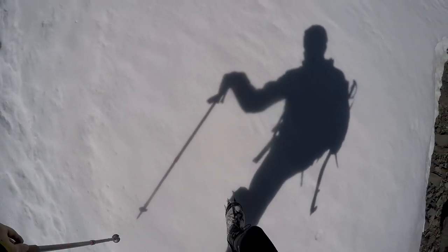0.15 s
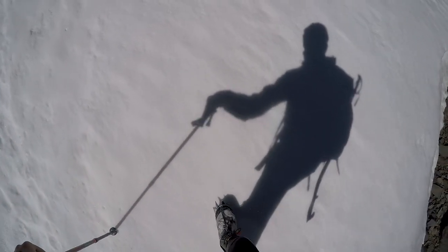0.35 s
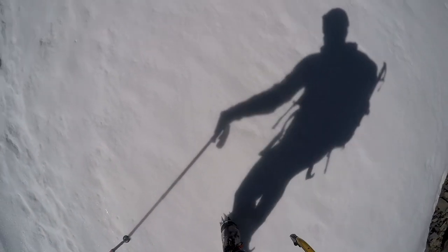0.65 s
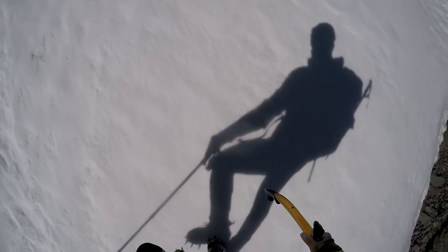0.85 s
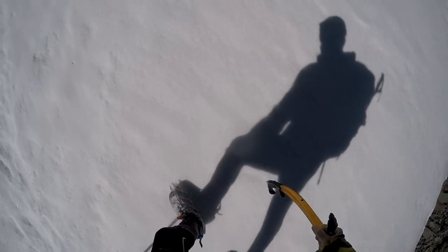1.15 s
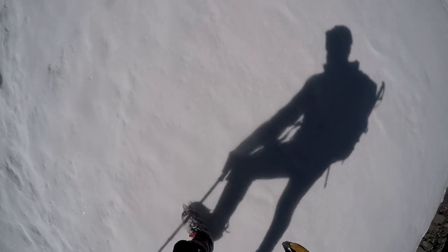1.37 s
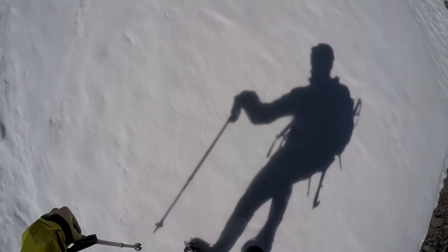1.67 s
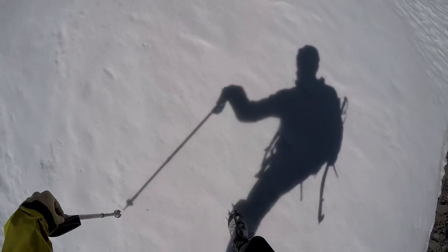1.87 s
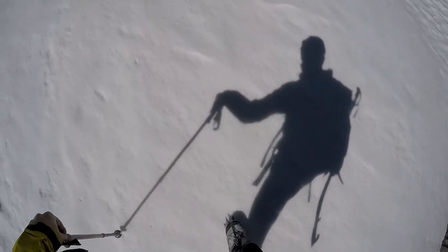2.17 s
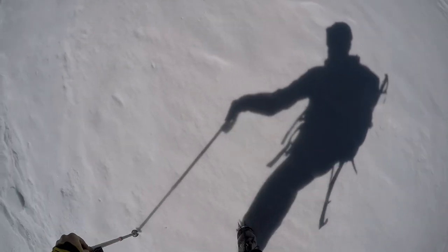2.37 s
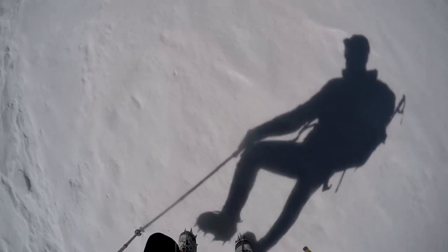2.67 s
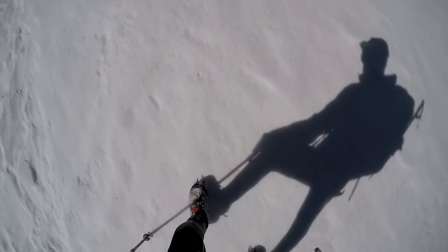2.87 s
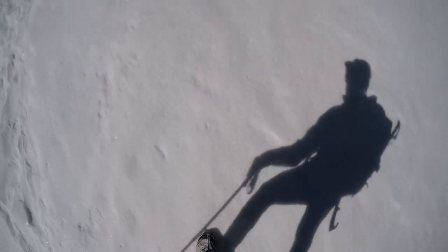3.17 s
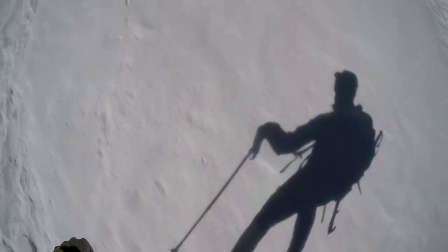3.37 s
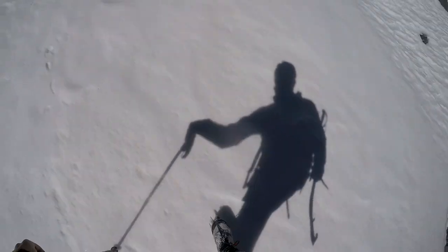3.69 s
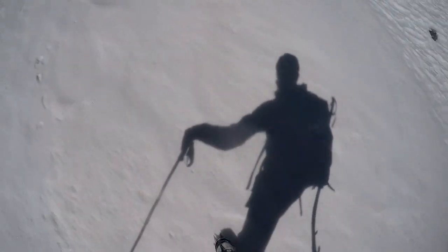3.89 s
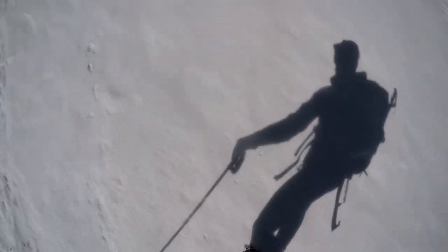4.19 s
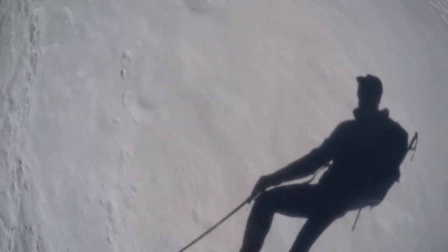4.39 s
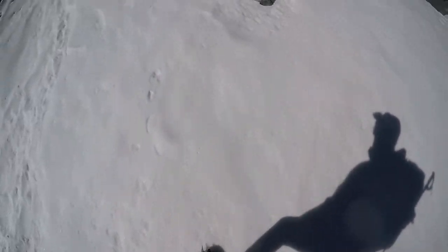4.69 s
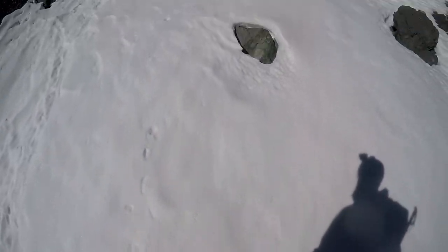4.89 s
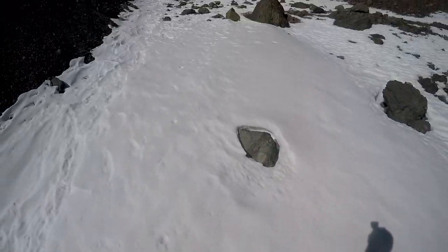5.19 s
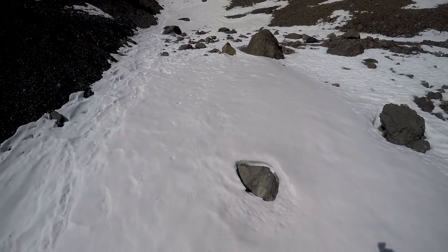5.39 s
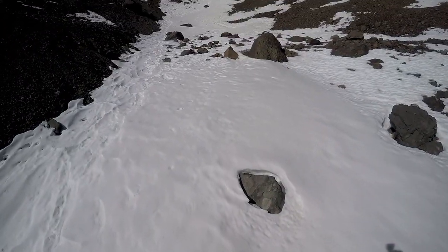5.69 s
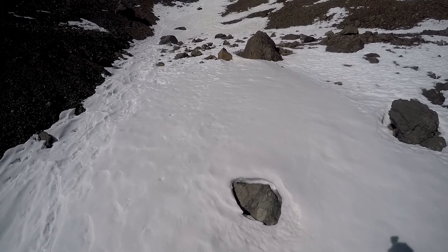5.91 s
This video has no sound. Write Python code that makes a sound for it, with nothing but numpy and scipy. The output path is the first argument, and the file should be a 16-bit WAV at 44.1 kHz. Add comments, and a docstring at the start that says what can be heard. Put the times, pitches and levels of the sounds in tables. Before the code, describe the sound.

Light wind rumbles on a helmet microphone on an open mountainside, with no echo. Spiked boots crunch into firm snow in six even steps, along with small crunches from a pole and faint metal ticks as the boots lift. Close, dull knocks from the camera mount fall between the steps. Toward the end the steps stop, a strap rasps, the mount knocks and scrapes, and the wind grows gustier.

```python
"""A climber walks up firm snow in crampons with a pole, heard from a camera on the helmet.
From the start, light wind rumbles on the camera case over a steady hiss, and straps rub.
Then, step by step, spikes crunch into the crust, the snow creaks under the weight, the camera's
loose mount knocks and the lifting crampon ticks. Later the mount also slips and the helmet hums.
Near the end the head lifts: a strap jerks tight and the wind buffets harder."""
import sys
import numpy as np
from scipy import signal
from scipy.fft import rfft, irfft, next_fast_len
from scipy.io import wavfile
from scipy.ndimage import uniform_filter1d, map_coordinates

SR = 44100
rng = np.random.default_rng(int(sys.argv[2]) if len(sys.argv) > 2 else 0)


def output_pcm(signal):
    """Save a mono or channel-first signal as 16-bit PCM at the path in sys.argv[1].

    Samples are clipped to [-1, 1] before scaling.
    """
    pcm = np.clip(np.atleast_2d(signal).T, -1, 1) * 32767
    wavfile.write(sys.argv[1], SR, np.round(pcm).astype(np.int16))


N = 266805


def amp(db):
    """Turn decibels into a number to multiply by."""
    return 10 ** (np.asarray(db) / 20)

def unit(x):
    """Scale a sound to an average (rms) level of 1."""
    return x / np.sqrt(np.mean(x ** 2) + 1e-20)

def along(points, hz):
    """Read between (pitch_hz, level_db) points, spacing the octaves evenly."""
    pitches, levels = np.transpose(points)
    return np.interp(np.log(hz + 1), np.log(pitches + 1), levels)

def tilt(hz, db_per_octave):
    """Decibels that make a sound brighter or duller, pivoting at 1000 Hz."""
    return db_per_octave * np.log2(np.clip(hz / 1000, .2, 2))

def filtered(x, response):
    """Multiply each frequency in a sound by response(hz)."""
    size = next_fast_len(len(x) + SR // 8)
    return irfft(rfft(x, size) * response(np.fft.rfftfreq(size, 1 / SR)), size)[:len(x)]

def coloured(x, tone):
    """Shape a sound with a tone table, at an average level of 1."""
    return unit(filtered(x, lambda hz: amp(along(tone, hz))))

def add(track, start_s, sound):
    """Mix a sound into the track."""
    start = max(round(start_s * SR), 0)
    part = track[start:start + len(sound)]
    part += sound[:len(part)]

def wobble(per_s):
    """A smooth curve through per_s random values a second."""
    points = rng.standard_normal(int(N * per_s / SR) + 4)
    return map_coordinates(points, [np.arange(N) * per_s / SR])

def grains(n, per_s, spread_db):
    """Tiny clicks of random size at random moments, like things cracking or catching."""
    sizes = amp(spread_db * np.clip(rng.standard_normal(n), -2, 2))
    signs = rng.choice([-1, 1], n)
    return unit(sizes * signs * (rng.random(n) < per_s / SR))

def stroke(length_s, rise):
    """A brief push: it builds over the share of its length given by rise, then dies away."""
    progress = np.arange(SR // 4) / SR / max(length_s, .003)
    force = (1 - np.exp(-progress / max(rise, .01))) * np.exp(-progress ** 2)
    return force / force.max()

def efforts(rows, fade_s):
    """Steady pushes that fade in and out, one per (start_s, end_s, level_db) row."""
    t = np.arange(N) / SR
    return sum(amp(db) * np.clip(np.minimum(t - start, end - t) / fade_s + .5, 0, 1)
               for start, end, db in rows)

def weight(levels_db, fade_s):
    """The climber's weight settling on the boot, at one level for each row of STEPS."""
    rows = [(start + wait, start + wait + hold, db)
            for (start, _, _, _, wait, hold, *_), db in zip(STEPS, levels_db)]
    return efforts(rows, fade_s)

def eddies(tone, evenness):
    """Swirling air: deep noise with its swells partly evened out."""
    flow = coloured(rng.standard_normal(N), tone)
    power = np.abs(signal.hilbert(flow)) ** 2
    swell = np.abs(uniform_filter1d(power, SR // 20)) + 1e-3
    return unit(flow / swell ** (evenness / 2))


# How hard the wind blows: time_s, level_db
WIND_STRENGTH = [(0.0, -29), (0.12, -40), (0.49, -36), (0.54, -25), (0.83, -31.5), (1.04, -48.5),
                 (1.18, -34), (1.35, -41.5), (1.38, -32.5), (1.75, -37.5), (2.02, -30.5), (2.07, -40),
                 (2.34, -31), (2.63, -47.5), (3.15, -36), (3.3, -47), (3.74, -40.5), (3.79, -28),
                 (4.4, -42.5), (4.68, -25.5), (4.72, -34), (4.89, -27.5), (4.95, -32.5), (5.17, -28),
                 (5.24, -41), (5.49, -27.5), (6.0, -31), (6.05, -35)]
# Single gusts thumping the case: peak_s, level_db, half_length_s
WIND_GUSTS = [(0, -43, 0.022), (0.598, -36, 0.032), (3.865, -41.5, 0.034), (4.902, -33.5, 0.045),
              (5.12, -36, .04), (5.653, -30.5, 0.078), (5.954, -35.5, 0.073)]
# Tones of the deep rumble and of the buffeting: pitch_hz, level_db
RUMBLE_TONE = [(8, -19), (22, 0), (35, -1.5), (50, 3), (62, -6.5), (80, -23), (130, -51), (300, -79)]
BUFFET_TONE = [(30, -44), (65, 7), (110, -2), (160, -10), (250, -19), (500, -38.5), (1200, -48.5),
               (5000, -120)]

def wind(head_up_s=4.4, turn_s=0.11, head_up_db=11.5, jolt_delay_s=0.028, jolt_half_s=0.035):
    """Air rumbles over the case and buffets it, harder in gusts, in steps and with the head up."""
    t = np.arange(N) / SR
    strength_db = np.interp(t, *np.transpose(WIND_STRENGTH))
    head_up = np.clip((t - head_up_s) / turn_s, 0, 1)
    breeze_db = -55 + 0.71 * (strength_db + 33)  # buffeting grows more slowly than the wind
    breeze = amp(breeze_db + head_up_db * head_up)
    jolts = [(start + jolt_delay_s, db, jolt_half_s) for start, *_, db in STEPS]
    thumps = sum(amp(db) * np.exp(-((t - peak) / half) ** 2) for peak, db, half in WIND_GUSTS + jolts)
    surge = weight([-54] * len(STEPS), fade_s=0.072)  # the body moves forward over each boot
    flutter = amp(2.5 * wobble(14))
    rumble = amp(strength_db) * flutter * eddies(RUMBLE_TONE, evenness=0.67)
    push = np.sqrt((breeze * flutter) ** 2 + thumps ** 2 + surge ** 2)
    lumps = amp(4 * wobble(30))
    return rumble + push * lumps * eddies(BUFFET_TONE, evenness=0.48)


# Tone of the hiss: pitch_hz, level_db
HISS_TONE = [(290, -1), (500, 2), (577, 0), (779, -2), (861, -1.5), (1010, -2), (1150, -4.5), (1360, -3.5),
             (1760, -4), (2310, -3.5), (2710, -6), (5380, -7), (8030, -13), (11000, -14.5), (15300, -16)]

def hiss(level_db=-64.44):
    """The microphone's own steady hiss."""
    return amp(level_db) * coloured(rng.standard_normal(N), HISS_TONE)


# Brief strap rubs as the body sways: start_s, end_s, level_db
SWAY_RUBS = [(.08, .28, -56), (.78, 1.025, -55), (1.45, 1.52, -57.5), (2.45, 2.5, -52.5), (2.6, 2.69, -61),
             (3.47, 3.6, -64), (4.11, 4.31, -59), (4.68, 4.8, -58), (5.18, 5.29, -59), (5.86, 6.01, -57.5)]
# Tone of a strap heard through the helmet: pitch_hz, level_db
RUB_TONE = [(120, -13.5), (220, -3.5), (290, 7), (400, 5), (470, -13.5), (600, -7), (760, -20), (1020, -14),
            (1200, -22), (1900, -20), (3000, -41), (8000, -80)]

def strap_rubs(catch_db=2, rest_db=-68):
    """Straps rub dully on the helmet, catching and letting go."""
    stepping = weight([rub_db for *_, rub_db, _ in STEPS], fade_s=0.081)
    swaying = efforts(SWAY_RUBS, fade_s=0.014)
    pull = (stepping + swaying) * amp(catch_db * wobble(40)) + amp(rest_db)
    return pull * coloured(grains(N, per_s=1800, spread_db=1.5), RUB_TONE)


# Each step: the spikes bite, then after a wait the weight comes on and holds. crush_db adds to bite_db.
# start_s, bite_db, base_length_s, crush_db, wait_s, hold_s, creak_db, strap_rub_db, air_jolt_db
STEPS = [(0.301, -46, 0.034, -1, 0.064, 0.2, -72, -63.5, -41.5),
         (1.133, -44.5, 0.042, 2, 0.016, 0.23, -72, -53.5, -41),
         (2.0356, -48, 0.044, 0.5, .16, 0.21, -68.5, -59.5, -45),
         (2.93, -48.5, 0.04, -3, 0.028, 0.34, -70.5, -60, -57),
         (3.785, -45, 0.038, 0, 0.072, 0.323, -70, -68.5, -44.5),
         (4.6795, -49.5, 0.045, 4, 0.031, 0.45, -71, -67.5, -35.5)]
# Tones of the icy crust and of the duller snow beneath: pitch_hz, level_db
CRUST_TONE = [(2500, -5), (5200, -5), (6500, -17), (7700, 5), (8500, 1.5), (9300, 10.5), (10200, -3.5),
              (11800, -3), (14000, -16), (16000, -19)]
CRUSH_TONE = [(600, -12), (1500, 3.5), (2400, -6.5), (3800, -4), (5200, 4), (6500, -0.5), (8000, -1.5),
              (11000, -29)]

def crampon_bites(gain_db=-10, crush_gain_db=-2, early_s=0.0069):
    """Spikes break the crust in a bright burst of tiny cracks and crush the snow beneath."""
    on_crust, beneath = np.zeros(N), np.zeros(N)
    for start, bite_db, length, crush_db, *_ in STEPS:
        force = amp(bite_db + gain_db) * stroke(length * 0.8, rise=0.13)
        add(on_crust, start - early_s, force)
        add(beneath, start - early_s, force * amp(crush_db + crush_gain_db))
    crust = on_crust * coloured(grains(N, per_s=6900, spread_db=5.5), CRUST_TONE)
    crush = beneath * coloured(grains(N, per_s=5100, spread_db=2), CRUSH_TONE)
    clumps = amp(2 * wobble(160))
    return (crust + crush) * clumps


def crumbles(level_db=-60, scatter_db=2, length_s=0.011, crackle_db=-6, per_step=4):
    """Extra rows for snow_crunches: snow gives way at random moments under a loaded boot."""
    return [(start + wait + hold * when, level_db + scatter_db * (2 * size - 1), length_s, crackle_db)
            for start, _, _, _, wait, hold, *_ in STEPS for when, size in rng.random((per_step, 2))]

# Crunches of the pole tip and shifting boots: start_s, level_db, base_length_s, crackle_db (added on)
POLE_AND_BOOT_SCUFFS = [(0.331, -52.5, 0.04, 3.5), (0.495, -50.5, 0.013, -19), (1.43, -57, 0.038, -7),
                        (2.327, -57.5, 0.03, 0), (2.85, -65, 0.009, 16), (3.712, -51.5, 0.032, 3),
                        (3.817, -53, 0.028, -3), (4.03, -51, 0.032, -6), (4.115, -55.5, 0.027, 3.5),
                        (5.647, -57.5, 0.042, -10)]
# Tones of the fine crunch and of the lower crackle: pitch_hz, level_db
CRUNCH_TONE = [(1500, 3), (3200, -1), (5200, 11), (6300, 1), (7600, 4), (8500, -6), (9300, 4), (10500, -14),
               (15000, -17)]
CRACKLE_TONE = [(500, -29), (1100, 1), (1900, 5), (2500, 9), (3500, -17), (6000, -30)]

def snow_crunches(gain_db=-8, crackle_gain_db=-3, early_s=0.002):
    """Packed snow breaks in small crunches as the pole and boots press, shift and pull out."""
    fine, coarse = np.zeros(N), np.zeros(N)
    pull_outs = [(start, db + 7, 0.033, -10) for start, db, _ in BOOT_LIFTS]  # same columns as scuffs
    for start, db, length, crackle_db in POLE_AND_BOOT_SCUFFS + pull_outs + crumbles():
        force = amp(db + gain_db) * stroke(length * 0.77, rise=0.23)
        add(fine, start - early_s, force)
        add(coarse, start - early_s, force * amp(crackle_db + crackle_gain_db))
    crunch = fine * coloured(grains(N, per_s=5000, spread_db=1), CRUNCH_TONE)
    crackle = coarse * coloured(grains(N, per_s=2500, spread_db=10), CRACKLE_TONE)
    return crunch + crackle


# Tone of creaking snow: pitch_hz, level_db
CREAK_TONE = [(1200, -43), (2200, -3.5), (3200, -11), (5200, 9), (6300, 1), (7600, 3.5), (8500, -2),
              (9300, 0), (10500, -6), (15000, -14)]

def snow_creak(judder_db=2):
    """Snow creaks finely for as long as it bears the weight."""
    load = weight([creak_db for *_, creak_db, _, _ in STEPS], fade_s=0.03)
    judder = amp(judder_db * wobble(45))
    return load * judder * coloured(grains(N, per_s=4000, spread_db=6), CREAK_TONE)


# Overall tone of the camera case: pitch_hz, level_db
CASE_TONE = [(20, -27), (100, -3), (200, -4), (300, 2), (400, 0), (470, -14), (700, -13), (780, -19),
             (1040, -12), (1130, -26), (1500, -43), (1850, -29), (2700, -50), (8000, -68)]
# Pitches at which the case rings: pitch_hz, width_hz, boost_db
CASE_RINGS = [(264, 30, 7), (400, 30, 2), (502, 25, 9), (592, 30, 7), (700, 40, 3), (996, 60, 6),
              (1310, 60, 5), (2330, 120, 10)]

def case_tap(tilt_db, size=8192, delay_at_1000_hz_s=0.00343):
    """One tap bends the case and makes it ring; the high pitches travel through it fastest."""
    hz = np.fft.rfftfreq(size, 1 / SR)
    rings_db = sum(db / (1 + (2 * (hz - pitch) / width) ** 2) for pitch, width, db in CASE_RINGS)
    level_db = along(CASE_TONE, hz) + tilt(hz, tilt_db) + rings_db
    # Line up the frequencies so that the ringing comes after the tap, never before it.
    cepstrum = irfft(np.log(amp(level_db)))
    response = np.exp(rfft(2 * cepstrum[:size // 2], size) - cepstrum[0])
    travel_phase = 4 * np.pi * delay_at_1000_hz_s * np.sqrt(1000 * hz)
    ring = -irfft(response * np.exp(-1j * travel_phase))[:size // 2]
    return ring / np.abs(ring).max()

# The mount hitting its stop: start_s, level_db, tilt_db_per_octave
MOUNT_KNOCKS = [(0.683, -34.5, 0.5), (1.2514, -29, 1.5), (1.534, -31.5, 1), (2.5034, -28.5, 1.5),
                (3.1922, -33.5, 0), (4.2106, -32, 1), (4.512, -36, -8), (4.836, -31.5, 0), (5.153, -32, 2),
                (5.296, -46, 4), (5.648, -34, -1.5)]

def mount_knocks(gain_db=6, early_s=0.0029):
    """The loose mount knocks on the camera case as the climber moves."""
    out = np.zeros(N)
    for start, db, tilt_db in MOUNT_KNOCKS:
        add(out, start - early_s, amp(db + gain_db) * case_tap(tilt_db))
    return out


# The rear boot pulling out of the snow: start_s, level_db, pitch_hz
BOOT_LIFTS = [(.699, -62.5, 6900), (1.522, -65, 6700), (2.51, -63.5, 6500), (3.31, -59, 6450),
              (4.227, -64, 6800)]

def crampon_ticks(ring_s=0.0088, width_hz=500):
    """As a boot lifts, the crampon's steel frame ticks with a short ring."""
    out = np.zeros(N)
    fade = stroke(ring_s, rise=0.12)
    for start, db, pitch in BOOT_LIFTS:
        noise = rng.standard_normal(len(fade))
        ring = filtered(noise, lambda hz: 1 / (1 + (2 * (hz - pitch) / width_hz) ** 2))
        add(out, start, amp(db) * fade * unit(ring))
    return out


# The mount sliding: start_s, level_db, base_length_s, tilt_db_per_octave
MOUNT_SLIPS = [(1.103, -50, 0.023, -3.5), (2.426, -44, 0.0096, -3.5), (2.601, -52, 0.042, -4),
               (4.825, -44, 0.017, 0.5), (5.684, -42, 0.013, 2), (5.695, -33.5, 0.017, -1.5),
               (5.751, -43.5, 0.096, -2), (5.789, -41.5, 0.039, -2.5), (5.994, -51, 0.012, 4.5)]
# Tone of its scraping: pitch_hz, level_db
SCRAPE_TONE = [(120, -22), (330, 11.5), (420, -8.5), (520, 3), (680, -4), (800, 4), (900, -9), (1050, 3),
               (1150, -31), (1500, -23), (1800, -17.5), (2350, -19.5), (3000, -29), (7000, -44)]

def mount_slips(gain_db=-1, catch_db=4):
    """The mount slides with a gritty scrape, sticking and letting go."""
    out = np.zeros(N)
    for start, db, length, tilt_db in MOUNT_SLIPS:
        force = stroke(length * 1.21, rise=0.15)
        grit = grains(len(force), per_s=3000, spread_db=2)
        scrape = unit(filtered(grit, lambda hz: amp(along(SCRAPE_TONE, hz) + tilt(hz, tilt_db))))
        sticking_db = catch_db * wobble(72)[:len(force)]
        add(out, start, amp(db + gain_db + sticking_db) * force * scrape)
    return out


# Hums of the helmet: start_s, level_db, length_s, pitch_hz
HELMET_HUMS = [(2.602, -39.5, 0.016, 380), (3.475, -49.5, 0.024, 360), (4.236, -36.5, 0.021, 359),
               (5.154, -27.5, 0.011, 317), (5.654, -28, 0.013, 237)]

def helmet_hums():
    """After a jolt, the helmet's shell vibrates briefly at one pitch."""
    out = np.zeros(N)
    for start, db, length, pitch in HELMET_HUMS:
        swell = stroke(length, rise=0.58)
        tone = np.sin(2 * np.pi * pitch * np.arange(len(swell)) / SR)
        add(out, start, amp(db) * swell * tone)
    return out


# Tugs on a strap as the head lifts: start_s, level_db, length_s
STRAP_JERKS = [(4.502, -36.5, 0.014), (4.52, -31, 0.0074), (4.816, -45, 0.028), (5.142, -46, 0.031),
               (5.306, -48.5, 0.01)]
# Pitches at which the tight strap rings: pitch_hz, width_hz, level_db
STRAP_RINGS = [(283, 134, -10), (395, 41, 1), (583, 44, -7), (824, 100, -16), (1074, 50, -18),
               (1346, 114, -22), (1755, 54, -20.5), (1900, 140, -27)]

def strap_rasps(dull_above_hz=2400):
    """A strap jerks tight and rasps: many tiny catches set it ringing."""
    def ringing(hz):
        rings = sum((-1) ** k * amp(db) * 1j * hz * width / (pitch ** 2 - hz ** 2 + 1j * hz * width)
                    for k, (pitch, width, db) in enumerate(STRAP_RINGS))
        return rings / np.sqrt(1 + (hz / dull_above_hz) ** 8)

    jerk = np.zeros(N)
    for start, db, length in STRAP_JERKS:
        add(jerk, start, amp(db) * stroke(length, rise=0.35))
    grit = grains(N, per_s=2500, spread_db=0.5)
    return filtered(jerk * grit, ringing) / filtered(grit, ringing).std()


def scene():
    """Add all the sounds into one channel; open snow gives no echo."""
    feet = crampon_bites() + crampon_ticks() + snow_crunches() + snow_creak()
    headgear = mount_knocks() + mount_slips() + helmet_hums() + strap_rubs() + strap_rasps()
    return (feet + headgear + wind() + hiss())[None]

def record(dry, top_hz=15330):
    """The camera keeps nothing higher than top_hz."""
    return np.array([filtered(channel, lambda hz: hz < top_hz) for channel in dry])


dry = scene()
out = record(dry)
output_pcm(out)
```